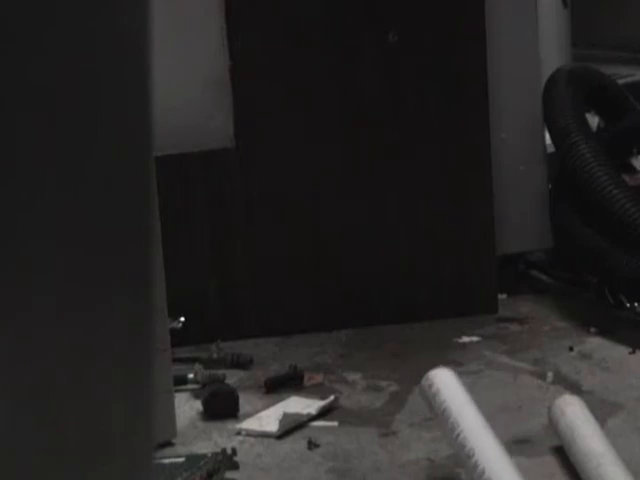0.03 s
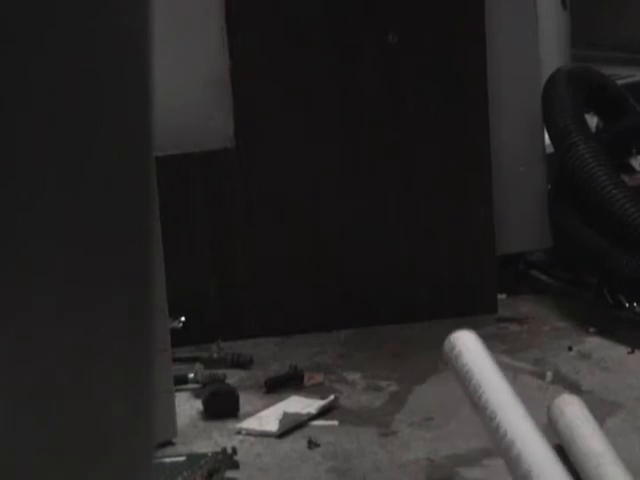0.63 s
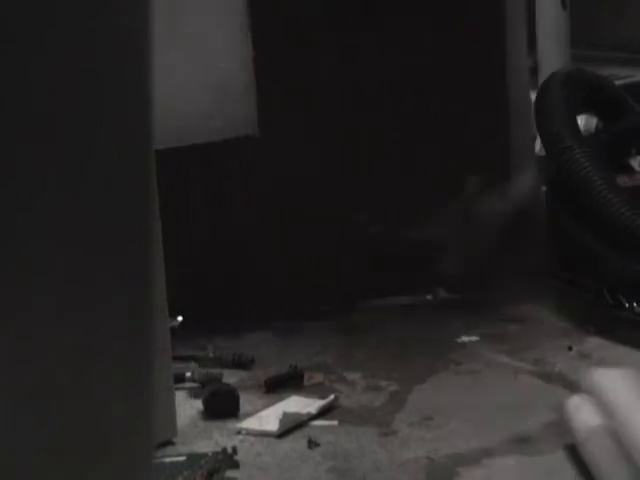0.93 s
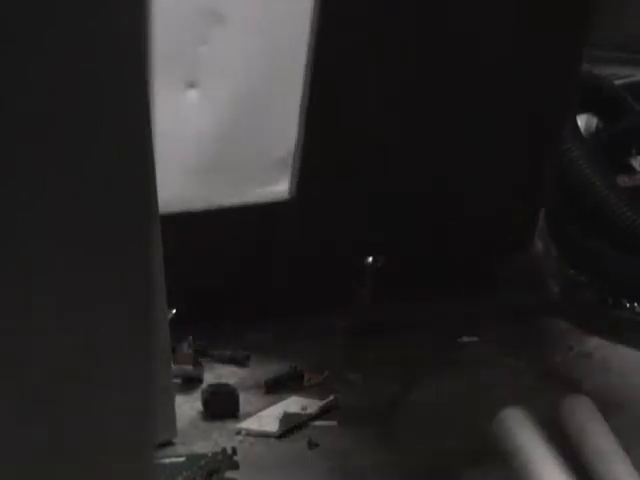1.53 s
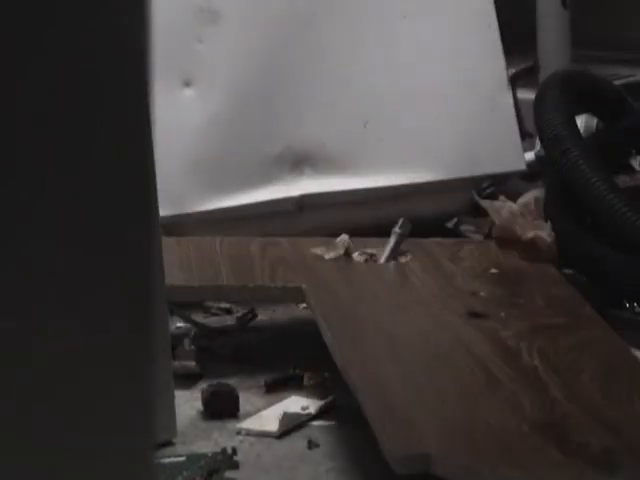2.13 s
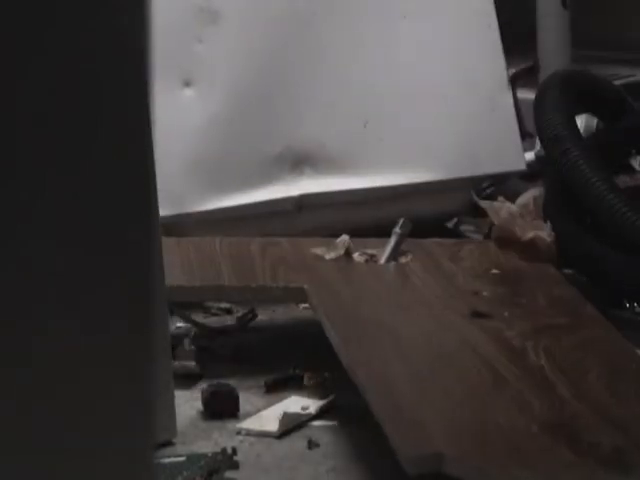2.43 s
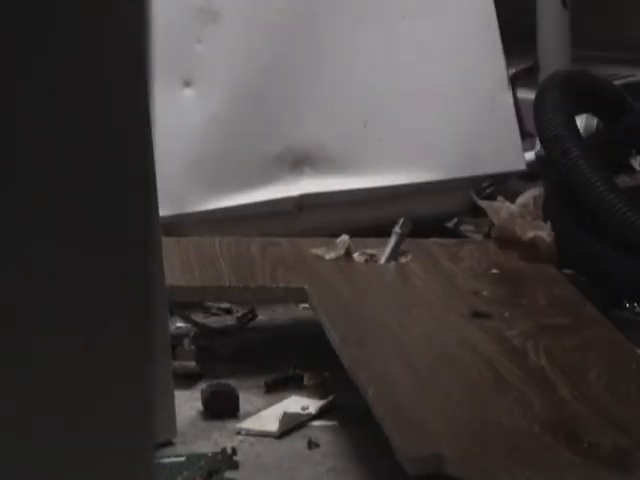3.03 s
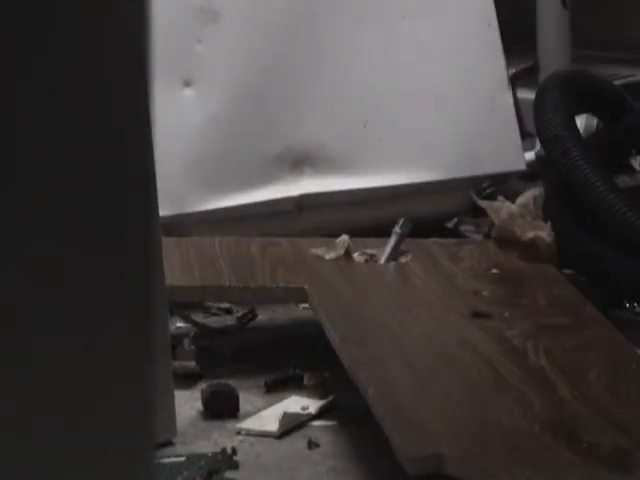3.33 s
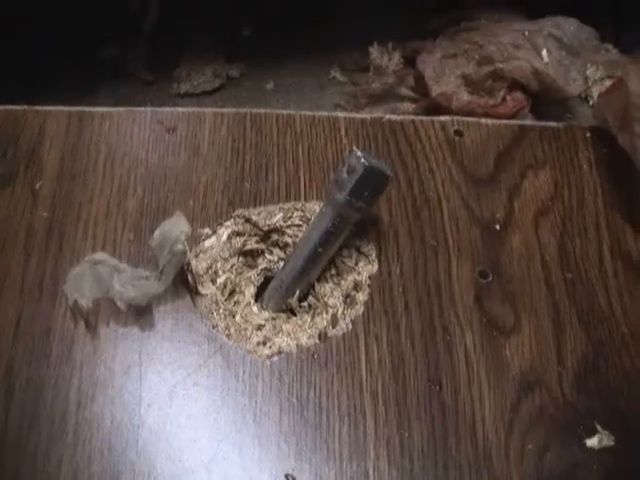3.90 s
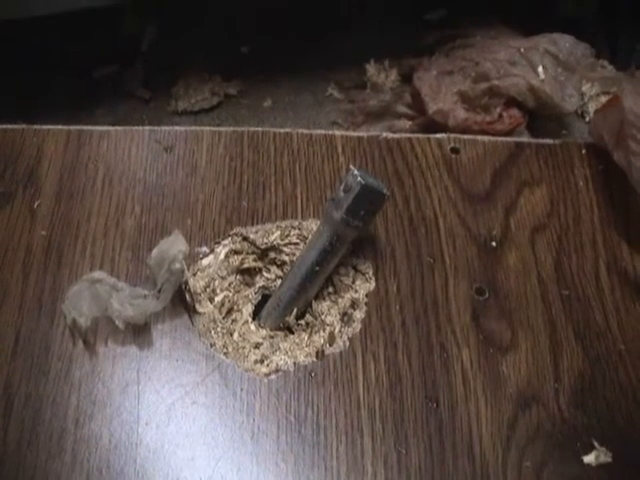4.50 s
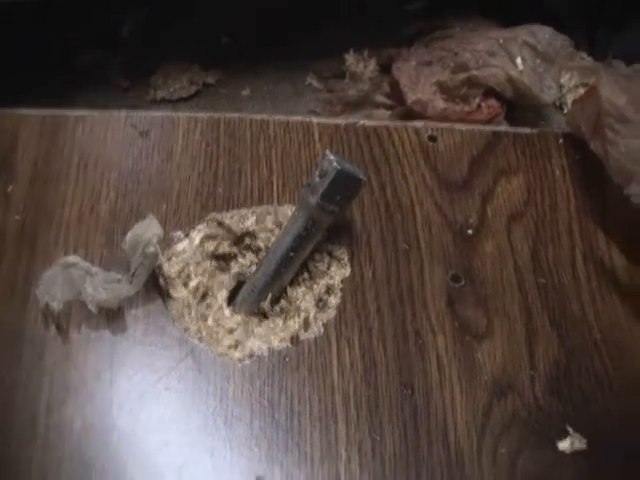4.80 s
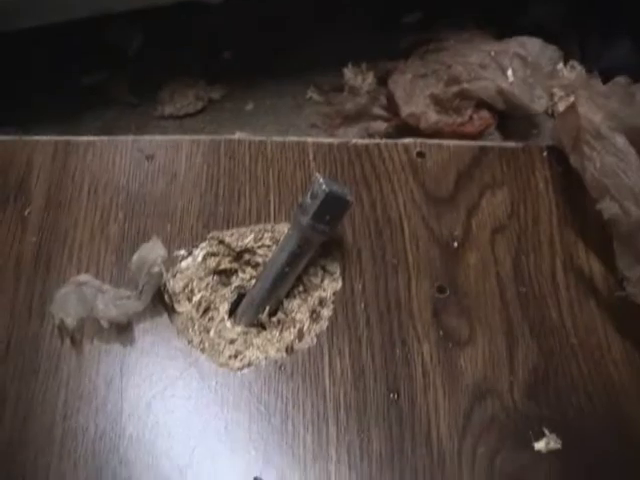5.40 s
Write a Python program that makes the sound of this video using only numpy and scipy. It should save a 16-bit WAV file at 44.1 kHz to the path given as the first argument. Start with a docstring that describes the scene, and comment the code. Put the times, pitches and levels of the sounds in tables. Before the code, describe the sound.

An air cannon fires with a loud hissing blast, a wooden board thumps and clatters down, then the microphone is tapped and handled.

```python
"""Air cannon in a workshop

The valve spits, the muzzle pops and the tank empties through the ringing barrel. The steel bolt hits
a wooden board, which thumps, topples and clatters down with a metal sheet. Chips settle; wood knocks.
A camera, overloaded by the blast, then whirs as it focuses and clicks as it is handled."""
import sys
import numpy as np
from scipy import signal
from scipy.fft import rfft, irfft, next_fast_len
from scipy.io import wavfile
from scipy.ndimage import uniform_filter1d

SR = 44100
rng = np.random.default_rng(int(sys.argv[2]) if len(sys.argv) > 2 else 0)


def dump_mix(stems):
    """Bounce the given channels to the path in sys.argv[1] as a 16-bit WAV at rate SR."""
    frames = np.atleast_2d(stems).T  # one column per channel
    limited = np.clip(frames, -1, 1)  # hard clip at full scale
    pcm = np.round(limited * 32767).astype(np.int16)
    wavfile.write(sys.argv[1], SR, pcm)


N = 244755
OPEN_S, DRAIN_S = 0.88, 1.122  # air flow starts; tank starts to run down

# noise spectra: f/Hz, level/dB
RUMBLE_COLOUR = [(25, -16), (55, -23), (92, -4), (150, -15.5), (400, -12), (700, -16), (1400, -24),
                 (3000, -48)]
HISS_COLOUR = [(500, -29.5), (1000, 0.5), (2000, 2.5), (5800, -2), (8000, -13), (11000, -13.5),
               (14800, -23)]
VALVE_COLOUR = [(400, -24), (1100, -14), (1800, -7.5), (2900, -7.5), (6400, -17.5), (14800, -30)]
JET_COLOUR = [(300, -11), (1000, -2), (1500, -6), (2300, -6), (2900, -8.5), (4500, -11), (6350, -14),
              (8500, -19.5), (14800, -33.5)]
SPLINTER_COLOUR = [(700, -36.5), (1400, -0.5), (2300, -0.5), (3100, -6.5), (4200, -5.5), (6000, -10.5),
                   (9000, -25), (14000, -37.5)]
CHIP_COLOUR = [(600, -11.5), (1800, -4.5), (3800, 5.5), (9000, -11), (14000, -22)]
TAP_COLOUR = [(200, 4), (1100, 2.5), (2050, -2), (2600, -5), (4400, -1.5), (6500, -8), (14000, -28.5)]

# resonances: f/Hz, width/Hz, level/dB
BARREL_MODES = [(549, 18, 2.5), (586, 9, 2), (661, 130, 0), (789, 61, -10)]
BOARD_MODES = [(470, 230, -3.5), (668.5, 20, 9), (749, 70, 0), (879, 75, 4.5), (1036, 50, 2),
               (1127, 70, -0.5), (1270, 190, -2), (1980, 130, -6.5), (2322, 91, -5.5)]
FLEX_MODES = [(115.3, 59, -16.5), (173.8, 30, -3.5), (288, 120, -1), (373, 57, -6.5)]  # whole board bending
TIMBER_MODES = [(86, 17, -3), (201, 43, 1), (342, 120, 2), (453, 29, 5), (600, 156, 1.5), (900, 340, -9),
                (1320, 550, -13.5)]

BOLT_MODES = [(2794, -1, 0.78), (7900, -18, 0.45)]  # bending: f/Hz, level/dB, t60/s
SHEET_MODES = [(648, 3), (688, -9)]  # metal sheet: f/Hz, level/dB
CASE_MODES = [(.6, -3), (1.001, 3.5), (1.7, -4)]  # camera body: ratio to thump pitch, level/dB
MOTOR_HARMONICS = [-73, -74, -69, -70, -74, -85, -72, -75, -65, -70, -66, -67, -79]  # orders 10-22: level/dB

HISS_SWELLS = [(3.3, .42, -49.5), (4.97, 0.25, -53.5), (5.5, 0.23, -47.5)]  # peak t/s, half width/s, level/dB
JET_BANDS = [(1000, 3600, -9.5, 5, 0.98, 47.5), (3570, 7350, -8, 6.5, 1, 91),
             (8800, 22000, -18.5, 7.5, 1.02, 129)]  # low f/Hz, high f/Hz, level/dB, build-up/dB, full t/s, fall/(dB/s)
JET_SURGES = [(0.956, .012, 1997, 350, -9.5), (1.01, .05, 1120, 400, -12), (1.142, .019, 4200, 1700, -7)]  # peak t/s, half width/s, f/Hz, width/Hz, level/dB
THUMPS = [(0.962, -13, 2), (1.27, -16.5, -23), (1.425, -11, -3.5), (1.518, -28, 2), (1.649, -16, -6)]  # standing board struck, rocking: t/s, level/dB, relative crack/dB
LANDINGS = [(1.8012, -9, -14.5, 1223), (1.836, -8.5, -7, 950), (1.865, -5, -11.5, 780),
            (1.939, -17, 3.5, 645), (1.9839, -11.5, -1.5, 990), (2.081, -16.5, -3, 1005),
            (2.128, -17.5, -4.5, 1035), (2.1813, -12, -4.5, 1466)]  # board bouncing: t/s, level/dB, relative crack/dB, contact f/Hz
SNAPS = [(1.8017, -4), (1.826, -9), (1.835, -0.5), (1.9257, -6.5), (1.9818, -6), (2.081, -16.5),
         (2.1821, -8)]  # wood snapping: t/s, level/dB
PUFFS = [(1.8007, -20.5), (1.9813, -31.5)]  # air from under the board: t/s, level/dB
CHIPS = [(2.352, -42.5), (2.55, -38), (2.66, -33), (2.73, -41), (3.721, -33)]  # chips landing: t/s, level/dB
KNOCKS = [(2.409, -32, -15), (3.29, -18, -8), (3.377, -32, -26), (3.548, -37, -34)]  # distant wood: t/s, level/dB, relative edge/dB
TAPS = [(3.85, -39, -1, 400), (3.965, -29.5, -29, 500), (4.06, -45.5, 7, 451), (4.642, -25.5, -16, 1450),
        (4.716, -44.5, 11, 380), (4.738, -39.5, 8.5, 600), (4.7646, -12, -4, 380), (4.7757, -20, 2, 320),
        (4.787, -27, 6, 450), (4.8022, -9.5, 3.5, 310), (4.833, -26, 1, 1000), (4.868, -40, 11, 560),
        (5.014, -14.5, 3.5, 627)]  # finger taps: t/s, level/dB, relative thump/dB, thump f/Hz
RUBS = [(4.771, 0.039, -40.5, 1), (4.872, 0.018, -42, 0), (4.984, 0.027, -36.5, 5),
        (5.019, 0.03, -47, 12.5), (5.467, 0.076, -42.5, -0.5)]  # finger slides: t/s, length/s, level/dB, relative thump/dB

SIDE_GAIN = [(250, 3), (700, -0.5), (2000, 1.5), (4000, -1), (8000, 0.5)]  # stereo width: f/Hz, gain/dB
BALANCE = [(60, -6), (400, -3), (2000, -2.05), (12000, -1.1)]  # f/Hz, left minus right/dB


def amp(db):
    """Decibels to gain."""
    return 10 ** (np.asarray(db) / 20)


def unit(x):
    """x at rms 1."""
    return x / np.sqrt(np.mean(x ** 2) + 1e-20)


def along(points, hz):
    """(f/Hz, value) points read on a log axis."""
    f, v = np.transpose(points)
    return np.interp(np.log(hz + 1), np.log(f), v)


def clock(size=N):
    """Sample times in s."""
    return np.arange(size) / SR


def filtered(x, response):
    """x through a frequency response."""
    n = x.shape[-1]
    m = next_fast_len(n + 4096)
    return irfft(rfft(x, m) * response(np.fft.rfftfreq(m, 1 / SR)), m)[..., :n]


def colour(points):
    """Response through (f/Hz, level/dB) points."""
    return lambda f: amp(along(points, f))


def resonant(modes):
    """Response of steep (f/Hz, width/Hz, level/dB) resonances."""
    return lambda f: sum(amp(db) * np.abs(f * w / (c * c - f * f + 1j * f * w)) ** 2
                         for c, w, db in modes)


def lowpass(hz):
    """Second-order low-pass response."""
    return lambda f: 1 / (1 + (f / hz) ** 2)


def splinter(top_db):
    """Response of cracking wood, shelved by top_db over 5-10 kHz."""
    return lambda f: colour(SPLINTER_COLOUR)(f) * amp(top_db * np.clip((f - 5000) / 5000, 0, 1))


def noise(response, size=N, side_db=-10):
    """Coloured stereo noise, rms 1."""
    mid, side = filtered(rng.standard_normal((2, size)), response)
    return unit(np.array([mid + amp(side_db) * side, mid - amp(side_db) * side]))


def jitter(rate_hz, size=N):
    """Smoothed mono noise, rms 1."""
    return unit(uniform_filter1d(rng.standard_normal(size), size=SR // rate_hz))


def patchy(x, depth_db):
    """x with random gain drift over time and frequency, rms 1."""
    spectrum = signal.stft(x, nperseg=1024)[2]
    drift = uniform_filter1d(rng.standard_normal(spectrum.shape[1:]), size=2, axis=0)
    drift = uniform_filter1d(drift, size=5, axis=1)
    gain = amp(depth_db * unit(np.tanh(unit(drift))))
    return unit(signal.istft(spectrum * gain, nperseg=1024)[1][:, :N])


def burst(t, rise_s, t60_s):
    """Envelope: rise from t = 0, exponential decay."""
    t = np.maximum(t, 0)
    return (1 - np.exp(-t / rise_s)) * np.exp(-np.log(1000) * t / t60_s)


def flow(build_db, full_s, fall_db_per_s, start_s=OPEN_S, rise_s=.003):
    """Air flow envelope: onset, build-up, hold, fall."""
    t = clock()
    to_go = np.clip((full_s - t) / (full_s - OPEN_S), 0, 1)
    db = -build_db * to_go - fall_db_per_s * np.maximum(t - DRAIN_S, 0)
    return np.clip((t - start_s) / rise_s, 0, 1) * amp(db)


def add(track, s, sound):
    """Mix sound into track at time s."""
    start = round(s * SR)
    part = track[:, start:start + sound.shape[1]]
    part += sound[:, :part.shape[1]]


def background(rumble_db=-51, dip_db=-3, dip_s=3.9, hum_db=-61, hiss_db=-59, whine_db=-63, fizz_db=-68):
    """Rumble dips as a faint hum enters; hiss swells over the camera's thin self-noise."""
    t = clock()
    fade = np.clip((t - dip_s) / 0.29, 0, 1)
    rumble = amp(rumble_db + dip_db * fade) * noise(colour(RUMBLE_COLOUR), side_db=0)
    hum = amp(hum_db) * fade * noise(resonant([(120, 12, 0)]), side_db=-1)
    whine = amp(whine_db) * noise(resonant([(6100, 1700, 0)]))
    fizz = amp(fizz_db) * rng.standard_normal((2, N))
    swell_power = sum(amp(db) ** 2 * np.exp(-((t - s) / half_s) ** 2) for s, half_s, db in HISS_SWELLS)
    hiss = np.sqrt(amp(hiss_db) ** 2 + swell_power) * noise(colour(HISS_COLOUR), side_db=-5)
    return rumble + hum + hiss + whine + fizz


def valve(trip_s=.78, tick_db=-38, spit_s=0.798, spit_db=-22, shudder_s=0.817, shudder_db=-25.5):
    """The valve trips, cracks open and spits; the pipework shudders."""
    t = clock()
    tick = amp(tick_db) * burst(t - trip_s, .0003, 0.15) * noise(colour(CHIP_COLOUR))
    spit = amp(spit_db) * burst(t - spit_s, 0.0011, 1.0) * noise(colour(VALVE_COLOUR), side_db=-6.5)
    pipes = noise(resonant([(109, 37, 2.5), (257, 150, 1)]), side_db=-3)
    return tick + spit + amp(shudder_db) * burst(t - shudder_s, 0.0016, 0.46) * pipes


def jet(rumble_db=-27, flutter_db=1.26, patchy_db=4.5):
    """Turbulent air; the treble dies first as tank pressure falls."""
    air = np.zeros((2, N))
    for low_hz, high_hz, db, build_db, full_s, fall_db_per_s in JET_BANDS:
        skirts = lambda f: np.sqrt((1 + (low_hz / (f + 1)) ** 8) * (1 + (f / high_hz) ** 8))
        band = noise(lambda f: colour(JET_COLOUR)(f) / skirts(f), side_db=-11)
        air += amp(db) * flow(build_db, full_s, fall_db_per_s) * patchy(band, patchy_db)
    rumble = noise(colour([(20, 0.5), (70, -8), (300, 7.5), (700, -10), (1500, -43.5)]), side_db=-13)
    air += amp(rumble_db) * flow(build_db=14, full_s=1.0, fall_db_per_s=35) * rumble
    eddies = jitter(rate_hz=150)
    return amp(flutter_db * eddies) * air


def muzzle(exit_s=0.882, pop_db=-2, push_db=-18):
    """The bolt exits with a hollow pop and a low push of air."""
    t = clock() - exit_s
    pop = amp(pop_db) * burst(t, 0.0015, 0.1) * noise(resonant([(760, 130, 0)]))
    air = noise(colour([(20, -5.5), (60, 9), (250, -17), (600, -44)]))
    return pop + amp(push_db) * burst(t, 0.01, 0.1) * air


def barrel(start_s=0.94, level_db=-12.5, fall_db_per_s=47, rush_db=-5, sharp=0.2, sink_s=0.075):
    """Pipe resonances hoot, starting sharp and sinking as the air cools."""
    t = clock()
    warped_s = t + sharp * sink_s * (1 - np.exp(-np.maximum(t - start_s, 0) / sink_s))
    hoot = np.array([np.interp(warped_s, t, channel) for channel in noise(resonant(BARREL_MODES))])
    rush = amp(rush_db) * noise(resonant([(700, 910, 0)]))
    return amp(level_db) * flow(0, DRAIN_S, fall_db_per_s, start_s, rise_s=.02) * (hoot + rush)


def surges():
    """The jet shrieks in one band after another."""
    t = clock()
    return sum(amp(db) * np.exp(-((t - s) / half_s) ** 2) * noise(resonant([(hz, width_hz, 0)]))
               for s, half_s, hz, width_hz, db in JET_SURGES)


def blow(flex_db, body_db, crack_db, contact_hz, t60_s, top_db, rise_s=0.0035):
    """One blow bends the board, rings it most near contact_hz and splinters it; the room draws it out."""
    t = clock(SR * 3 // 4)
    stereo_rad = np.array([[0.38], [-0.38]])
    bend = sum(amp(db) * np.sin(2 * np.pi * (hz + width_hz * rng.uniform(-1.4, 1) / 10) * t + stereo_rad)
               for hz, width_hz, db in FLEX_MODES)
    boom = noise(resonant(FLEX_MODES), len(t), side_db=-13.5)
    decay = burst(t, rise_s, t60_s)
    flex = amp(flex_db) * (burst(t, rise_s, 0.37 * t60_s) * bend + decay * boom / 2)
    contact = lambda f: amp(5 * np.exp(-(np.log2((f + 1) / contact_hz) / 0.49) ** 2))
    body = amp(body_db) * decay * noise(lambda f: resonant(BOARD_MODES)(f) * contact(f), len(t))
    crack = amp(crack_db) * burst(t, rise_s, 0.74 * t60_s) * noise(splinter(top_db), len(t))
    return flex + body + crack


def board():
    """Standing, the board booms as it bends; on the floor it clatters higher and shorter."""
    out = np.zeros((2, N))
    for s, db, crack_db in THUMPS:
        add(out, s, blow(db, db - 3.5, db + crack_db, contact_hz=520, t60_s=0.7, top_db=2.5))
    for s, db, crack_db, hz in LANDINGS:
        add(out, s, blow(db - 16, db, db + crack_db, contact_hz=hz, t60_s=0.33, top_db=-1))
    return out


def howl(start_s=1.0, peak_s=1.115, peak_db=-13.5, rise_db_per_s=130, fall_db_per_s=80,
         start_hz=690, end_hz=563, sink_s=0.041, tilt_db=-0.6, waver_rad=0.77, waver_hz=14):
    """At full flow the barrel's overtones speak, hoarse and sinking as the air cools."""
    out, t = np.zeros((2, N)), start_s + clock(SR // 2)
    hz = end_hz + (start_hz - end_hz) * np.exp((start_s - t) / sink_s)
    db = peak_db - rise_db_per_s * np.maximum(peak_s - t, 0) - fall_db_per_s * np.maximum(t - peak_s, 0)
    phase = 2 * np.pi * np.cumsum(hz) / SR
    tone = sum(amp(tilt_db * k) * np.sin(k * phase + waver_rad * noise(lowpass(waver_hz), len(t)))
               for k in range(1, 11))
    add(out, start_s, amp(db) * unit(tone))
    return out


def bolt(hit_s=1.337, hit_db=-15, skid_db=-10):
    """The steel bolt rings, and squeals briefly as it skids in its hole."""
    t = clock() - hit_s
    ring = sum(amp(hit_db + db) * burst(t, 0.0012, t60_s) * np.sin(2 * np.pi * hz * t)
               for hz, db, t60_s in BOLT_MODES)
    skid = np.exp(-((t - .035) / .012) ** 2)
    squeal = amp(skid_db) * skid * np.sin(2 * np.pi * BOLT_MODES[0][0] * t)
    return squeal + ring * (1 + 0.22 * noise(lowpass(50)))


def scrape(slip_s=1.58, slip_db=-25, catch_s=1.769, catch_db=-12, t60_s=0.77):
    """The toppling board's edge slides ever faster, then catches with a bright rasp."""
    t = clock()
    speed = np.clip((t - slip_s) / (catch_s - slip_s), 0, 1) * (t < catch_s)
    slip = amp(slip_db) * speed * noise(splinter(top_db=8))
    rasp = noise(lambda f: splinter(top_db=-1.5)(f) * f / (f + 4000))
    return slip + amp(catch_db) * burst(t - catch_s, 0.0022, t60_s) * rasp


def snaps(crack_db=3, crack_t60_s=0.021, puff_t60_s=0.14):
    """Dry cracks of wood; the board slaps flat and pushes out air."""
    out, t = np.zeros((2, N)), clock(SR // 4)
    for s, db in SNAPS:
        crack = burst(t, 0.000068, crack_t60_s) * noise(splinter(top_db=-6.5), len(t))
        add(out, s, amp(db + crack_db) * crack)
    for s, db in PUFFS:
        add(out, s, amp(db) * burst(t, 0.0016, puff_t60_s) * noise(lowpass(60), len(t), side_db=-12))
    return out


def sheet(land_s=1.915, ring_db=-40, ring_t60_s=3.85, room_db=-38, room_t60_s=2.5):
    """The fallen metal sheet hums, wavering, over the room's fading echo of the clatter."""
    t = clock()
    modes = sum(amp(db) * np.sin(2 * np.pi * hz * t) for hz, db in SHEET_MODES)
    ring = amp(ring_db) * burst(t - land_s, .01, ring_t60_s) * modes
    room = noise(colour([(100, -4.5), (500, -0.5), (1500, -6.5), (5000, -13), (14000, -29)]))
    waver = 1 + 0.22 * noise(lowpass(10))
    return ring * waver + amp(room_db) * burst(t - land_s, .01, room_t60_s) * room


def chips(click_db=1, room_db=-13):
    """Splinters drop: a tick and its faint room tail."""
    out, t = np.zeros((2, N)), clock(SR // 3)
    shape = amp(click_db) * burst(t, 0.00011, 0.022) + amp(room_db) * burst(t, 0.0043, 0.37)
    for s, db in CHIPS:
        add(out, s, amp(db) * shape * noise(colour(CHIP_COLOUR), len(t)))
    return out


def knocks(thud_t60_s=0.39, edge_t60_s=0.29, edge_hz=2900):
    """Heavy wood knocks further off, heard mostly through the room."""
    out, t = np.zeros((2, N)), clock(SR // 2)
    edge_band = lambda f: f / (f + 800) / (1 + (f / edge_hz) ** 4)
    for s, db, edge_db in KNOCKS:
        thud = burst(t, 0.003, thud_t60_s) * noise(resonant(TIMBER_MODES), len(t), side_db=-9.5)
        edge = burst(t, 0.00086, edge_t60_s) * noise(edge_band, len(t))
        add(out, s, amp(db) * (thud + amp(edge_db) * edge))
    return out


def focus(start_s=3.83, step_hz=299.65, run_db=-3, kick_db=6, settle_s=0.41):
    """The lens motor starts hard and settles, whining on multiples of its step rate."""
    t = np.maximum(clock() - start_s, 0)
    whine = sum(amp(db) * np.sqrt(2) * np.sin(2 * np.pi * (k * step_hz * t + rng.random()))
                for k, db in enumerate(MOTOR_HARMONICS, start=10))
    return np.minimum(t / 0.011, 1) * amp(run_db + kick_db * np.exp(-t / settle_s)) * whine


def handling(click_t60_s=0.013, thump_t60_s=0.014, stereo_turns=0.064,
             grit_db=3, rub_hz=400, low_cut_hz=130):
    """Taps ring the camera body, each spot at its own pitch; sliding fingers rasp on it."""
    out, t = np.zeros((2, N)), clock(SR // 4)
    for s, db, thump_db, hz in TAPS:
        click = burst(t, .0001, click_t60_s) * noise(colour(TAP_COLOUR), len(t), side_db=-3)
        ring = 0
        for ratio, mode_db in CASE_MODES:
            turns = ratio * hz * t + rng.random() + rng.normal(0, stereo_turns, (2, 1))
            ring += amp(mode_db) * np.sin(2 * np.pi * turns)
        add(out, s, amp(db) * (click + amp(thump_db) * burst(t, 0.0005, thump_t60_s) * ring))
    rub_modes = [(ratio * rub_hz, ratio * rub_hz / 2, db) for ratio, db in CASE_MODES]
    for s, length_s, db, thump_db in RUBS:
        stroke = np.minimum(t / 0.00343, 1) * amp(-60 * np.maximum(t - length_s, 0) / 0.097)
        grit = amp(grit_db * jitter(300, len(t)))
        rasp = grit * noise(colour(TAP_COLOUR), len(t), side_db=-8.5)
        body = noise(resonant(rub_modes), len(t), side_db=3)
        add(out, s, amp(db) * stroke * (rasp + amp(thump_db) * body))
    return filtered(out, lambda f: f ** 2 / (f ** 2 + low_cut_hz ** 2))


def bump(at_s=5.418, level_db=-35, ring_hz=215, t60_s=0.23):
    """A hand bumps the camera softly."""
    body = noise(resonant([(ring_hz, 110, 0)]), side_db=-8)
    return amp(level_db) * burst(clock() - at_s, .002, t60_s) * body


def scene():
    """Workshop slightly right, widened most in the bass; handling and lens motor centred."""
    cannon = valve() + muzzle() + jet() + surges() + barrel() + howl()
    shop = cannon + board() + scrape() + snaps() + bolt() + sheet() + chips() + knocks() + background()
    mid = shop.mean(axis=0)
    shop = mid + filtered(shop - mid, colour(SIDE_GAIN))
    shop = filtered(shop, lambda f: amp(np.array([along(BALANCE, f), -along(BALANCE, f)]) / 2))
    return shop + handling() + bump() + focus()


def record(dry, ceiling=0.79, hardness=5, top_hz=15000):
    """Overload rounds off the peaks; nothing passes above top_hz."""
    clipped = dry / (1 + np.abs(dry / ceiling) ** hardness) ** (1 / hardness)
    return filtered(clipped, lambda f: f < top_hz)


dry = scene()
out = record(dry)
dump_mix(out)
```